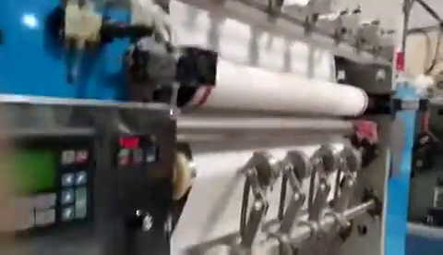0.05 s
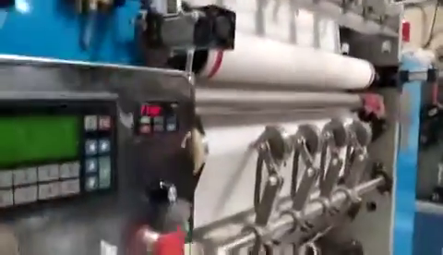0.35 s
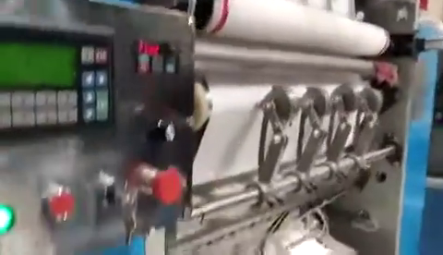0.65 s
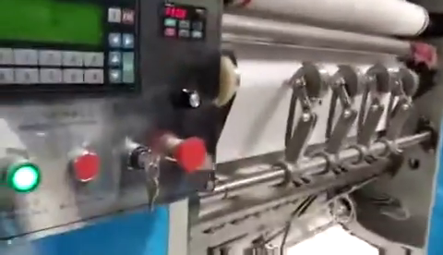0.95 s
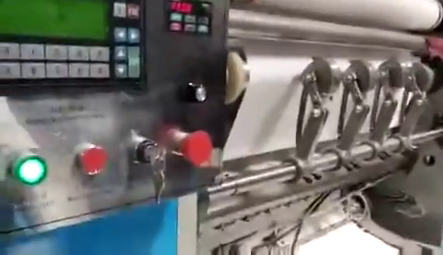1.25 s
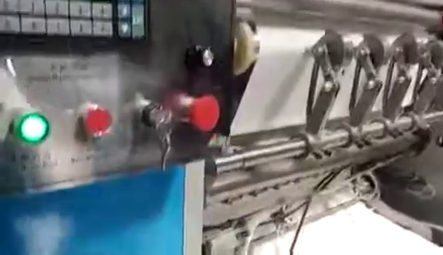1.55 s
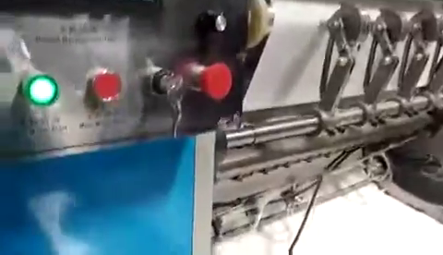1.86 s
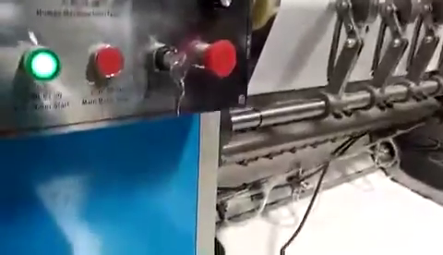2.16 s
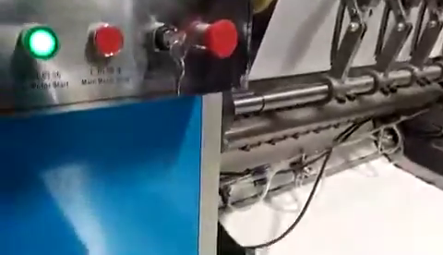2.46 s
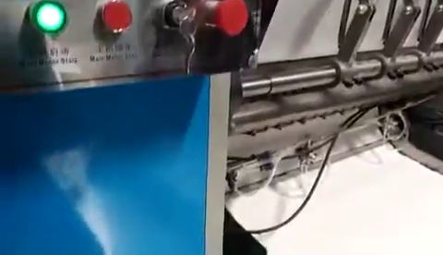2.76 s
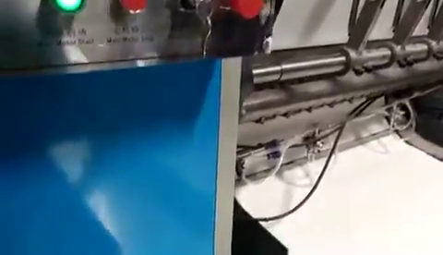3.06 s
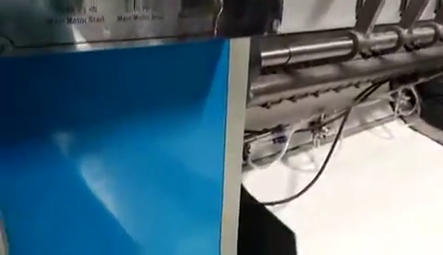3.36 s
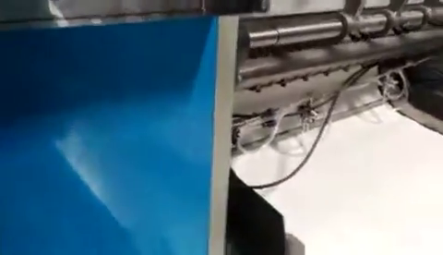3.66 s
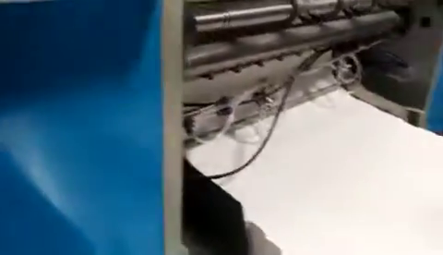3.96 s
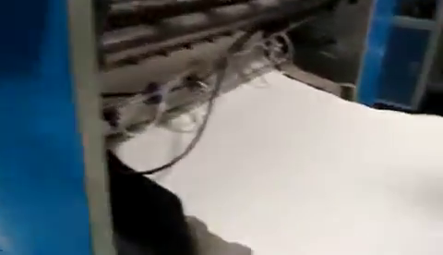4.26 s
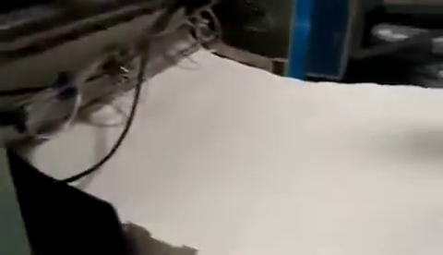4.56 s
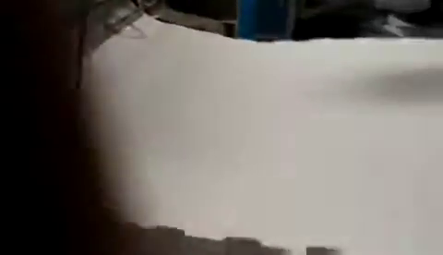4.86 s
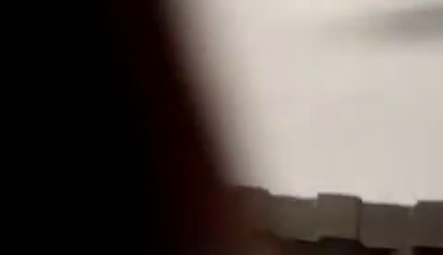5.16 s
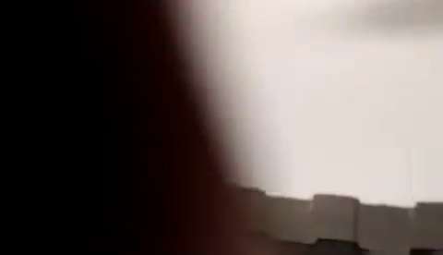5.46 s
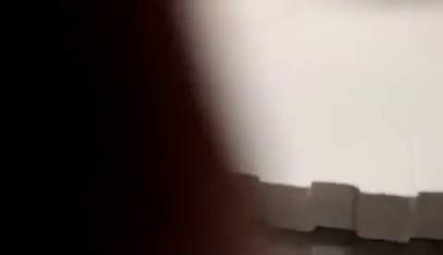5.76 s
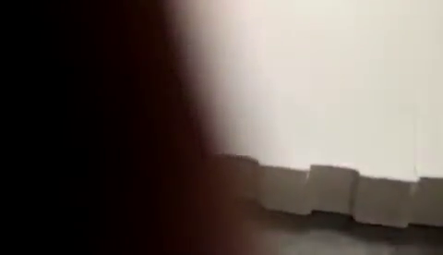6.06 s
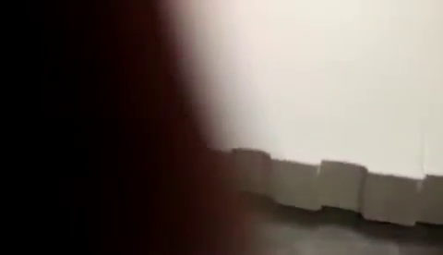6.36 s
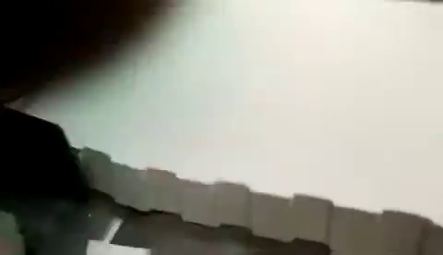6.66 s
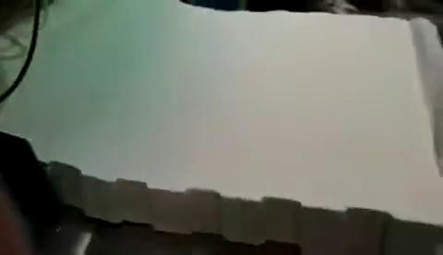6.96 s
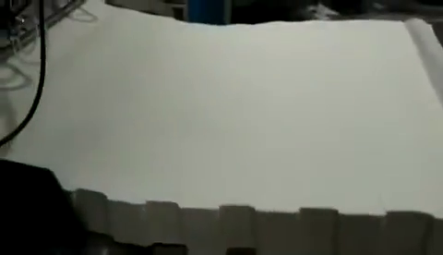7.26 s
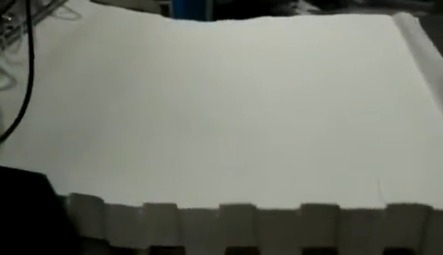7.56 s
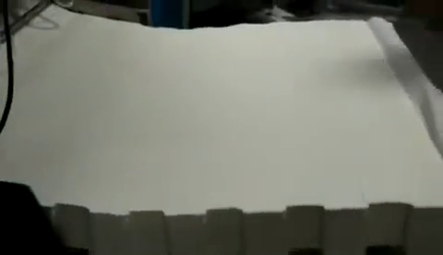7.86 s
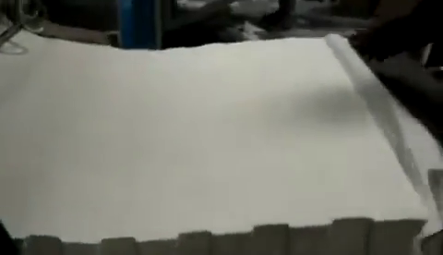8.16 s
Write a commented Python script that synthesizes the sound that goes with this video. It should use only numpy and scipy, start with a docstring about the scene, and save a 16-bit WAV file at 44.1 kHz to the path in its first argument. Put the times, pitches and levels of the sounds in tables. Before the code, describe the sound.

A tissue folding machine runs loudly and without a break for about eight seconds, close to a handheld microphone in a factory. The steel frame rumbles, the gears hum with a slight throb, and the shafts ring faintly. Paper rushes over the rolls with an airy hiss, and suction puffs pulse about seven times a second. During the first five seconds, very short, sharp, high clicks cut through, most regularly between 1.7 and 4.3 seconds, a little over two a second. Near 5 seconds the gear hum swells. A roller's wavering tone, present throughout, sings out more strongly at 6 seconds and again from 7 to 8. Paper scuffs lightly now and then, and gives brief, high, falling squeaks around 1, 3 and 6 seconds, with two more just after 8 seconds.

```python
"""A tissue folding machine runs at about seven folds a second in a factory hall, near a handheld camera.
Throughout: frame rumble, gear hum, linkage thrum, a singing roller, rushing paper, a suction puff a fold.
For the first five seconds, sharp cracks, mostly on a third fold, make the limiter duck.
Near 5 s the gear hum swells; from 6 s the roller sings out in spells.
Paper scuffs over a guide and squeaks on the rolls now and then, up to the end."""
import sys
import numpy as np
from scipy import signal
from scipy.fft import rfft, irfft, next_fast_len
from scipy.io import wavfile
from scipy.ndimage import uniform_filter1d, minimum_filter1d, map_coordinates

SR = 44100
rng = np.random.default_rng(int(sys.argv[2]) if len(sys.argv) > 2 else 0)


def log_audio(samples):
    """Write samples as a 16-bit WAV file to the path given in sys.argv[1]."""
    # one column per channel
    frames = np.atleast_2d(samples).T
    # limit to full scale, then quantise
    limited = np.clip(frames, -1, 1)
    pcm = np.round(limited * 32767).astype(np.int16)
    wavfile.write(sys.argv[1], SR, pcm)


N = 371322

FOLD_HZ, FOLDS_PER_TURN = 7.089, 3

# Steady running (time [s], frame rumble [dB], paper rush [dB], air hiss [dB])
RUN_LEVELS = [(0, -18, -19, -23), (1.4, -18.5, -18.5, -23), (3.7, -17.5, -19, -23.3),
              (5.1, -17, -18.5, -23.2), (6.6, -17.5, -18.5, -23.5), (8.4, -17.5, -18, -23)]
# Noise spectra (frequency [Hz], relative density [dB])
FRAME_SPECTRUM = [(20, -56), (60, -47), (90, -35), (115, -18), (165, -15), (210, -3), (260, 0.5),
                  (330, -2.5), (400, -1.5), (500, -3), (600, -4), (800, -4.5), (1100, -13.5), (2200, -60)]
PAPER_SPECTRUM = [(500, -54), (900, -6), (1120, -3), (1500, -1.5), (1900, -3.5), (2200, -2.5), (2530, -6),
                  (2780, -4.5), (3300, -6), (3900, -9.5), (5000, -14), (8000, -54)]
AIR_SPECTRUM = [(2000, -26), (3800, 0.5), (5000, 2), (6200, 0.5), (7300, -2), (8500, 0.5), (9400, 3.5),
                (10000, 0.5), (11000, -18.5), (13000, -88)]
SCUFF_SPECTRUM = [(1500, -25), (3000, -17), (4500, 6.5), (6500, 1), (8500, 4), (9700, 6.5), (11000, -15),
                  (13000, -44)]
PORT_SPECTRUM = [(2000, -34), (5000, -3.5), (7500, -5.5), (8700, 2), (9500, 5.5), (10200, 0), (11000, -19),
                 (13000, -73)]
BLADE_SPECTRUM = [(300, -21), (3000, -16), (7000, -14), (9500, 10.5), (11000, -45), (13000, -28),
                  (20000, 18)]
# Left-right likeness (frequency [Hz], correlation [0..1])
STEREO_CORRELATION = [(4100, 1), (5000, 1), (6000, 0.81), (8000, 0.46), (9600, 0.68), (10400, 0.98),
                      (10800, 1)]
# Linkage partials (multiple of fold rate [1], level [dB])
LINKAGE_PARTIALS = [(15, -61), (16, -75), (17, -44.5), (18, -52.5), (19, -51), (21, -44.5), (22, -62),
                    (23, -48), (24, -46), (31, -51), (33, -45), (34, -40), (35, -34), (39, -43.5),
                    (42, -58), (45, -29.5), (50, -44), (51, -39), (52, -37.5), (55, -53)]
# Gear tones (multiple of fold rate [1], level re hum [dB], slope re hum [dB/dB], throb [dB])
GEAR_PARTIALS = [(36, -5.5, .7, 2), (46, -7, 1.35, 1), (48, -7, 1.05, 1.7)]
# Gear hum as the camera moves along the machine (time [s], level [dB])
HUM_LEVELS = [(0, -25.5), (1.9, -23.5), (4.2, -26), (4.9, -16.5), (5.8, -20), (8.4, -20.5)]
# Singing roller (time [s], level [dB])
SING_LEVELS = [(0, -22.5), (.45, -23.5), (.9, -30), (1.3, -21.5), (2.1, -22.5), (2.7, -29.5), (3.3, -25.5),
               (4.65, -27.5), (4.9, -23), (5.8, -26), (6.0, -17.5), (6.6, -26), (7.15, -19.5), (7.7, -18.5),
               (8.4, -27.5)]
# Shaft and roll resonances (frequency [Hz], half width [Hz], level [dB])
SHAFT_MODES = [(502, 20, -34.5), (1398, 39, -34), (1573, 45, -35), (2186, 66, -33), (2808, 45, -35.5)]
# Shaft ringing, stronger while the camera faces them (time [s], gain [dB])
SHAFT_GAINS = [(0, -1), (1.5, 2.5), (3.8, 1), (5.5, -2.5)]
# Web scuffing over a guide (centre [s], half length [s], level [dB])
SCUFF_EVENTS = [(.27, 0.057, -24), (2.3, 0.032, -24), (3.2, .07, -22), (4.45, 0.031, -21),
                (4.55, 0.15, -23.5), (6.72, 0.055, -27), (7.36, 0.17, -23)]
# Paper squeaks (onset [s], length [s], start pitch [Hz], end pitch [Hz], level [dB])
SQUEAK_EVENTS = [(.822, 0.089, 7150, 6360, -21.5), (1.323, 0.049, 5800, 4340, -19.5),
                 (2.33, 0.12, 8050, 7900, -24), (2.838, 0.056, 3940, 3500, -21),
                 (2.928, 0.061, 4130, 3400, -17.5), (5.033, 0.034, 3110, 2900, -24),
                 (5.822, 0.13, 7400, 5600, -22.5), (6.327, 0.044, 6000, 4400, -15),
                 (8.124, 0.094, 4050, 2600, -17.5), (8.227, 0.065, 4120, 2660, -18.5)]
# Suction puff strength (time [s], level [dB])
SUCTION_LEVELS = [(0, -20.5), (1.4, -20.5), (2.2, -15), (3.1, -20), (4.4, -17), (6.5, -19.5), (8.4, -20.5)]
# Cracks, most as the cutting roll comes round (time [s], level [dB])
CRACK_EVENTS = [(0.035, -2), (0.879, 2), (1.726, 3.5), (2.15, 2), (2.573, 3.5), (2.993, 1.5), (3.42, 4),
                (3.844, 1.5), (4.267, 2), (5.072, 0)]


def amp(db):
    """Decibels to gain."""
    return np.exp(np.asarray(db) * np.log(10) / 20)


def unit(x):
    """Scale to rms 1."""
    return x / np.sqrt(np.mean(x ** 2) + 1e-20)


def time_s():
    """Time of each sample."""
    return np.arange(N) / SR


def log_interp(points, hz):
    """Interpolate (frequency [Hz], value) points on a log axis."""
    point_hz, values = np.transpose(points)
    return np.interp(np.log(hz + 1), np.log(point_hz + 1), values)


def curves(rows):
    """One per-sample curve for each column after the time."""
    knots_s, *columns = np.transpose(rows)
    return [np.interp(time_s(), knots_s, column) for column in columns]


def wobble(rate_hz):
    """Smooth random curve through knots at rate_hz."""
    knots = rng.standard_normal(int(N * rate_hz / SR) + 4)
    fine = np.arange(0, len(knots) - 1, 1 / 8)
    return np.interp(time_s() * rate_hz, fine, map_coordinates(knots, [fine]))


def bumps(rows):
    """Gaussian swells from (centre [s], half length [s], level [dB])."""
    out, t = np.zeros(N), time_s()
    for centre_s, half_s, db in rows:
        near = slice(*np.searchsorted(t, [centre_s - 4 * half_s, centre_s + 4 * half_s]))
        out[near] += amp(db) * np.exp(-((t[near] - centre_s) / half_s) ** 2)
    return out


def filtered(x, response):
    """Apply a frequency response."""
    size = next_fast_len(N + SR // 4)
    return irfft(rfft(x, size) * response(np.fft.rfftfreq(size, 1 / SR)), size)[..., :N]


def noise(gain, channels=1):
    """Independent noise rows shaped by gain(hz)."""
    size = next_fast_len(N, True)
    bins = rng.standard_normal((channels, size // 2 + 1, 2)).view(complex)[..., 0]
    return irfft(bins * gain(np.fft.rfftfreq(size, 1 / SR)), size)[:, :N]


def stereo_noise(spectrum):
    """Shaped noise, mid at rms 1; left and right differ only in the treble."""
    def gain(hz):
        correlation = log_interp(STEREO_CORRELATION, hz)
        side_gain = np.sqrt((1 - correlation) / (1 + correlation))
        return amp(log_interp(spectrum, hz)) * np.array([np.ones_like(hz), side_gain])
    mid, side = noise(gain, channels=2)
    return np.array([mid + side, mid - side]) / np.std(mid)


def ring(centre_hz, half_width_hz):
    """Friction-driven resonance, rms 1."""
    return unit(noise(lambda hz: 1 / (1 + ((hz - centre_hz) / half_width_hz) ** 2))[0])


def patchy(x, depth_db):
    """Patches of about 250 Hz by 50 ms swell and fade independently."""
    bins = signal.stft(x, nperseg=512)[2]
    field = uniform_filter1d(rng.standard_normal(bins.shape[1:]), size=3, axis=0)
    field = uniform_filter1d(field, size=9, axis=1)
    return signal.istft(bins * amp(depth_db * unit(field)), nperseg=512)[1][:, :N]


def frame(gain_db=-0.2, shake_db=0.6):
    """The steel frame rumbles, shaken in the same uneven pattern every fold."""
    level_db = curves(RUN_LEVELS)[0]
    fold_phase = time_s() * FOLD_HZ % 1
    pattern = map_coordinates(rng.standard_normal(20), [fold_phase * 20], mode="grid-wrap")
    rumble = stereo_noise(FRAME_SPECTRUM) * amp(shake_db * unit(pattern))
    return amp(level_db + gain_db) * unit(rumble)


def motor(level_db=-42, whine_hz=3090, waver_rad=0.3):
    """Thin motor whine."""
    return amp(level_db) * np.sin(2 * np.pi * whine_hz * time_s() + waver_rad * wobble(4.5))


def shafts(catch_db=3):
    """Friction rings the steel shafts on and off."""
    gain_db, = curves(SHAFT_GAINS)
    ringing = sum(amp(db) * unit(ring(hz, half_width_hz) * amp(catch_db * wobble(7)))
                  for hz, half_width_hz, db in SHAFT_MODES)
    return amp(gain_db) * ringing


def roller(note_db=-1, ring_db=-4.5, sing_hz=875, waver_rad=1.05):
    """A roller sings: a wavering note over a friction resonance."""
    level_db, = curves(SING_LEVELS)
    note = np.sqrt(2) * np.sin(2 * np.pi * sing_hz * time_s() + waver_rad * wobble(22))
    ringing = ring(centre_hz=869.3, half_width_hz=28)
    return amp(level_db) * (amp(note_db) * note + amp(ring_db) * ringing)


def drive(linkage_db=-1, gear_db=-0.04, slip_cycles=0.0025, flutter_db=1.54, throb_peak_s=0.19):
    """Linkage and gears sound at multiples of the fold rate; the gears throb twice a roll turn."""
    def tone(multiple, cycles):
        return np.sqrt(2) * np.sin(2 * np.pi * (multiple * cycles + rng.random()))
    fold_phase = (FOLD_HZ * time_s() + slip_cycles * wobble(2.03)) % 1
    cycle = np.linspace(0, 1, 4096)
    thrum_cycle = sum(amp(db) * tone(multiple, cycle) for multiple, db in LINKAGE_PARTIALS)
    thrum = np.interp(fold_phase, cycle, thrum_cycle)
    hum_db, = curves(HUM_LEVELS)
    swing_db = hum_db - hum_db.mean()
    throb_hz = 2 * FOLD_HZ / FOLDS_PER_TURN
    load = np.cos(2 * np.pi * throb_hz * (time_s() - throb_peak_s))
    gears = np.zeros(N)
    for multiple, db, slope, throb_db in GEAR_PARTIALS:
        level_db = db + slope * swing_db + throb_db * load + flutter_db * wobble(8.3)
        gears += amp(level_db) * tone(multiple, fold_phase)
    return amp(linkage_db) * thrum + amp(gear_db + hum_db.mean()) * gears


def web(air_gain_db=-0.9, flap_db=0.5, crinkle_db=1.0, patchy_db=1.6):
    """The paper web rushes over the rolls, flapping and crinkling; suction air hisses."""
    _, paper_db, air_db = curves(RUN_LEVELS)
    flutter = amp(flap_db * wobble(35) + crinkle_db * wobble(700))
    paper = amp(paper_db) * stereo_noise(PAPER_SPECTRUM)
    air = amp(air_db + air_gain_db) * stereo_noise(AIR_SPECTRUM)
    return flutter * patchy(paper + air, patchy_db)


def scuffs(grain_db=2, re_squeak_db=-5.0, spread=0.63):
    """Paper drags over a guide: a bright, grainy rustle, alone and under every squeak."""
    under_squeaks = [(onset_s + length_s / 2, spread * length_s, db + re_squeak_db)
                     for onset_s, length_s, _, _, db in SQUEAK_EVENTS]
    rustle = unit(stereo_noise(SCUFF_SPECTRUM) * amp(grain_db * wobble(400)))
    return bumps(SCUFF_EVENTS + under_squeaks) * rustle


def squeaks(overtone_db=-17, rasp_hz=420):
    """Paper sticks and slips on a roll: a falling note, rougher as it fades."""
    out, jitter = np.zeros(N + SR), wobble(2500)
    for onset_s, length_s, start_hz, end_hz, db in SQUEAK_EVENTS:
        progress = np.linspace(0, 1, int(length_s * SR))
        span = int(onset_s * SR) + np.arange(len(progress))
        glide_hz = start_hz * (end_hz / start_hz) ** progress
        slip_hz = rasp_hz * (0.55 + progress) * jitter.take(span, mode="wrap")
        phase = 2 * np.pi * np.cumsum(glide_hz + slip_hz) / SR
        note = np.sqrt(2) * (np.sin(phase) + amp(overtone_db) * np.sin(2 * phase))
        out[span] += amp(db) * np.sin(np.pi * np.sqrt(progress)) * note
    return out[:N]


def puffs(gain_db=-0.5, accent_db=1.5, scatter_db=2.1, first_s=0.033, jitter_s=0.0011,
          spit_s=0.0038, swell_db=-7, rise_s=0.0043, fall_s=0.039):
    """Each fold, air swells at a suction port, spits as it opens, then fades; every third is stronger."""
    power, t = np.zeros(N), time_s()
    folds = np.arange(int(N / SR * FOLD_HZ) + 1)
    lateness, strength = rng.standard_normal((len(folds), 2)).T
    opens_s = first_s + folds / FOLD_HZ + jitter_s * lateness
    levels_db = np.interp(opens_s, *np.transpose(SUCTION_LEVELS))
    levels_db += accent_db * (folds % FOLDS_PER_TURN == 0) + scatter_db * strength
    for open_s, db in zip(opens_s, levels_db):
        near = slice(max(0, int((open_s - 0.07) * SR)), int((open_s + 0.1) * SR))
        age_s = t[near] - open_s
        spit = np.exp(-np.abs(age_s) / spit_s)
        swell = np.exp(-np.abs(age_s) / np.where(age_s < 0, rise_s, fall_s))
        power[near] += amp(db + gain_db) ** 2 * (spit + amp(swell_db) ** 2 * swell)
    return np.sqrt(power) * stereo_noise(PORT_SPECTRUM)


def cracks(half_length_s=0.0017):
    """Blade cracks: very short bursts, mostly extreme treble."""
    envelope = bumps([(centre_s, half_length_s, db) for centre_s, db in CRACK_EVENTS])
    return envelope * stereo_noise(BLADE_SPECTRUM)


def scene():
    """The machine at arm's length."""
    machinery = drive() + roller() + shafts() + motor() + frame()
    return machinery + web() + puffs() + cracks() + scuffs() + squeaks()


def limiter(x, limit_db=-4.0, recovery_db_per_s=50):
    """Gain drops at once, holds about 40 ms, then creeps back."""
    power = np.abs(uniform_filter1d(x.mean(0) ** 2, size=200))
    excess_db = np.maximum(10 * np.log10(power + 1e-12) - limit_db, 0)
    held_db = -minimum_filter1d(-excess_db, size=1801, origin=900)
    ramp_db = recovery_db_per_s * time_s()
    duck_db = np.maximum.accumulate(held_db + ramp_db) - ramp_db
    return x * amp(-uniform_filter1d(duck_db, size=96))


def record(dry, ceiling=0.92, mono_below_hz=4100, top_hz=11300):
    """Camera: limiter, soft clip, mono below the treble, top cut."""
    ducked = limiter(dry)
    left, right = ducked / (1 + np.abs(ducked / ceiling) ** 16) ** (1 / 16)
    mid = filtered((left + right) / 2, lambda hz: hz < top_hz)
    side = filtered((left - right) / 2, lambda hz: (hz > mono_below_hz) & (hz < top_hz))
    return np.array([mid + side, mid - side])


dry = scene()
out = record(dry)
log_audio(out)
```